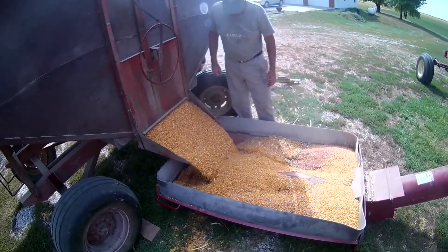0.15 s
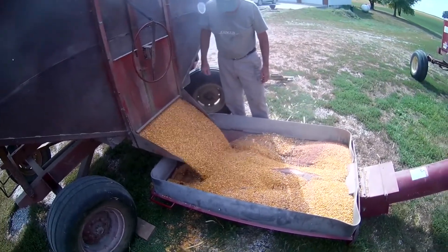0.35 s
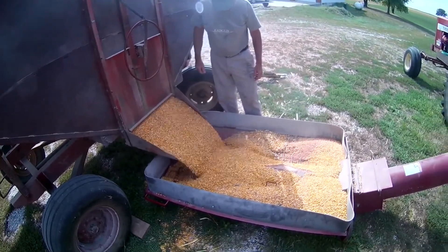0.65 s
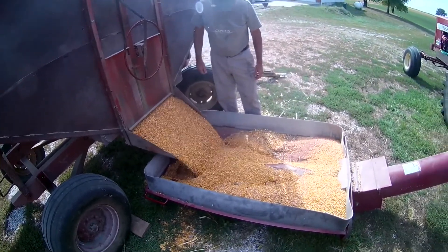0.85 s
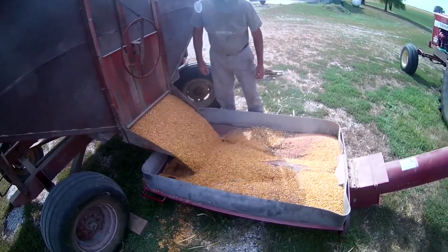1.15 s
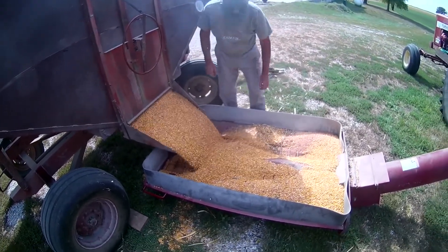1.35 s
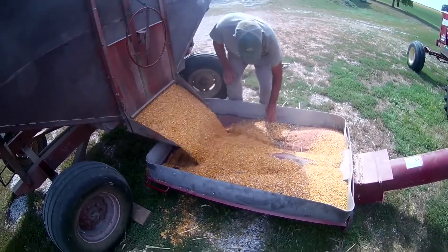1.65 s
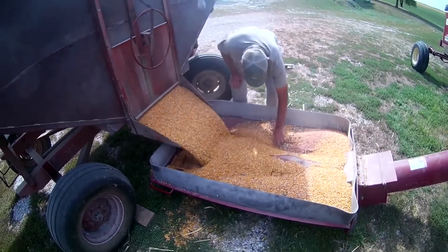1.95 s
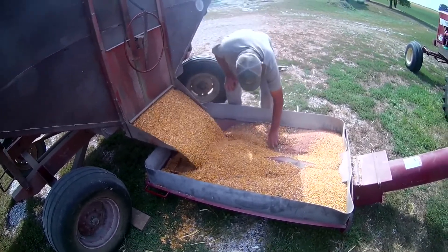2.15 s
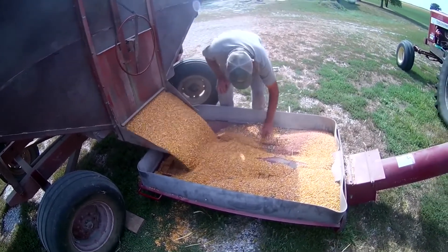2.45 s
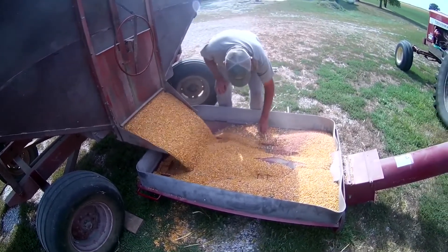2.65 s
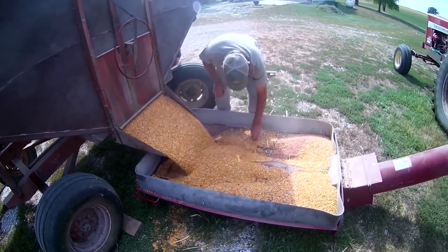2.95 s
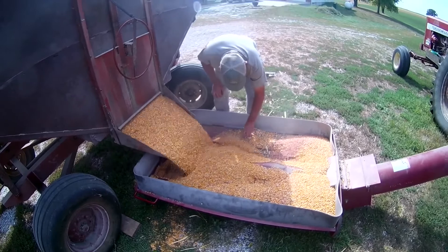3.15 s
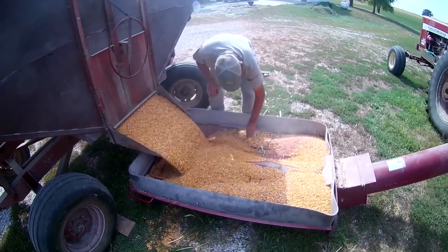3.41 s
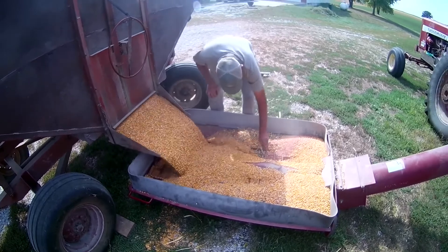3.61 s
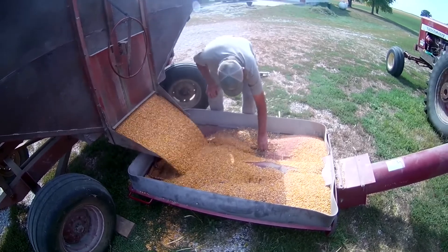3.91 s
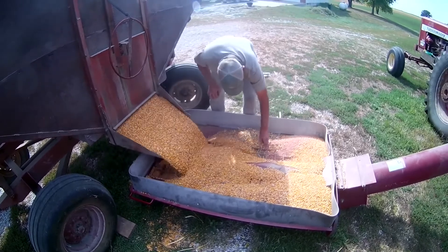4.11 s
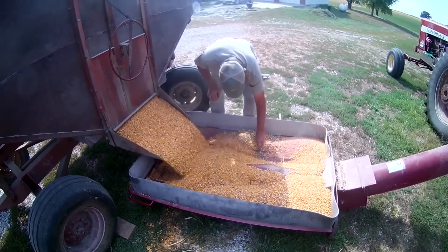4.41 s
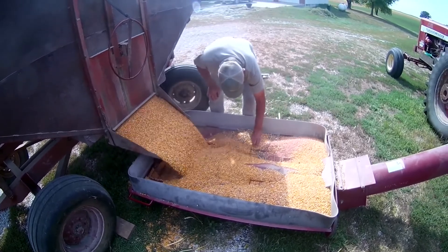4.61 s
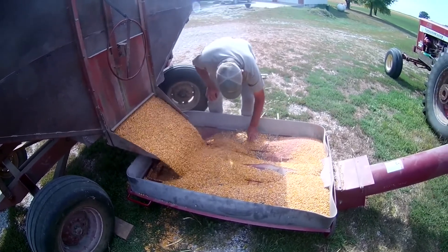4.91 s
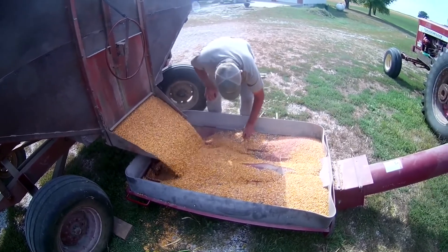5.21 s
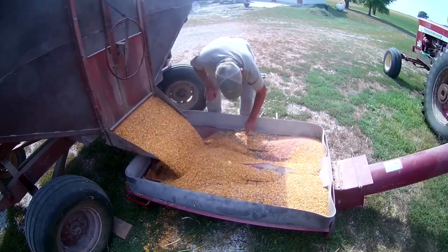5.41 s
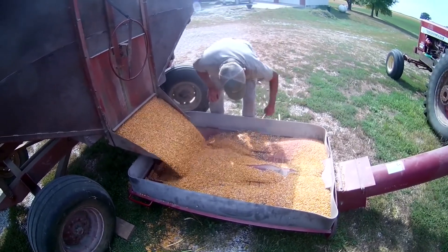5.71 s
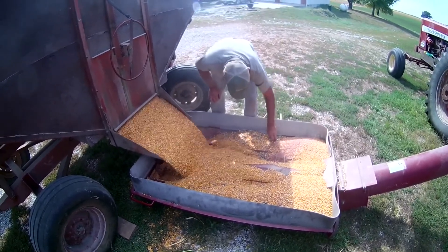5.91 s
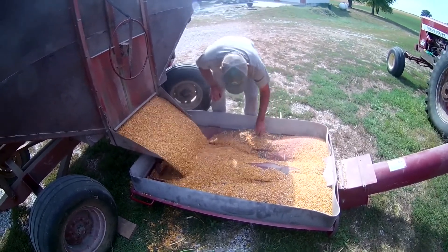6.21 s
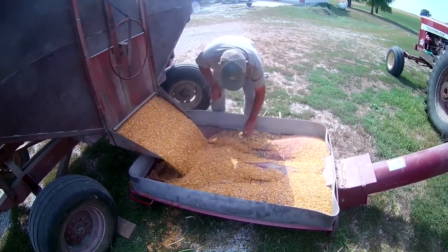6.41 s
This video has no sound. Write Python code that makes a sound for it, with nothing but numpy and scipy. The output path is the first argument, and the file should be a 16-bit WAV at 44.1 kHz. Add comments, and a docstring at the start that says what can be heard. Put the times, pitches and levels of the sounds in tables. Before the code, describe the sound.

Constant farm machinery roar: engine drone, piercing gear whine around 1150 hertz, clatter, and the dense bright hiss of corn pouring into a hopper.

```python
"""A six-cylinder diesel tractor idles fast in a farmyard and turns a grain auger: sines locked to the engine
cycle give engine orders, gear whine and hydraulic pump; shaped noise gives clatter and roar. Noise-driven
resonators ring as housing and auger tube. A second motor, steady sines, drones just below the firing rate, so
the bass throbs. Shelled corn, random impulses and noise, hisses down a steel chute into the hopper. Faint
steady tones lie at the very top. A small boxed-in microphone hears it and adds an airy top hiss, shaped noise."""
import sys
import numpy as np
from scipy import signal
from scipy.fft import rfft, irfft
from scipy.io import wavfile
from scipy.ndimage import uniform_filter1d

SR = 44100
rng = np.random.default_rng(int(sys.argv[2]) if len(sys.argv) > 2 else 0)


def output_pcm(signal):
    """Save a mono or channel-first signal as 16-bit PCM at the path in sys.argv[1].

    Samples are clipped to [-1, 1] before scaling.
    """
    pcm = np.clip(np.atleast_2d(signal).T, -1, 1) * 32767
    wavfile.write(sys.argv[1], SR, np.round(pcm).astype(np.int16))


N = 289296

# engine run: time_s, engine_cycle_hz, whine_level_db
ENGINE_RUN = [(0.0, 11.296, -49.9), (0.5, 11.303, -48.5), (1.2, 11.3, -47.9), (1.6, 11.326, -45.6),
              (2.1, 11.324, -42.0), (3.1, 11.338, -42.8), (3.8, 11.315, -41.4), (4.2, 11.29, -46.3),
              (4.8, 11.316, -42.0), (5.6, 11.326, -41.0), (5.95, 11.338, -44.6), (6.56, 11.308, -41.4)]
# strongest engine tones: multiple_of_engine_cycle, level_db
ENGINE_ORDERS = [(6, -56.0), (12, -65.0), (13, -68.0), (14, -69.0), (15, -65.0), (16, -61.0), (18, -62.0),
                 (29, -66.0), (45, -69.0), (49, -68.0), (52, -67.0), (55, -67.0), (56, -59.0), (60, -67.0),
                 (63, -68.0), (66, -62.0), (67, -67.0), (69, -61.0), (71, -62.0), (74, -68.0), (75, -64.0),
                 (81, -65.0), (90, -67.0), (93, -60.0), (95, -65.0), (96, -58.0), (97, -63.0), (99, -57.0),
                 (103, -59.0), (105, -58.0), (107, -63.0), (108, -54.0), (109, -62.0), (110, -60.0),
                 (111, -55.0), (112, -61.0), (113, -63.0), (115, -58.0), (117, -57.0), (123, -61.0),
                 (124, -66.0)]
# hydraulic pump ripple: multiple_of_pump_rate, level_db
PUMP_RIPPLE = [(1, -73), (3, -59), (6, -65), (7, -55), (8, -64), (9, -70)]
# second motor: pitch_hz, level_db
DRONE_TONES = [(65.025, -58), (130.05, -73), (184.75, -61), (260.1, -73)]
# spectrum shape of block, exhaust and auger tube: frequency_hz, relative_db
ROAR_SHAPE = [(20, -22.5), (55, -15), (85, -11.5), (240, -13), (330, -9), (490, -13), (565, -9.5),
              (670, -13.5), (1010, -10), (1250, -3), (1320, -2.5), (1430, -14.5), (1590, -12.5),
              (1690, -8.5), (1890, -13), (2020, -8.5), (2300, -19), (2700, -27.5), (3500, -58)]
# spectrum shape of kernels on sheet steel: frequency_hz, relative_db
CORN_SHAPE = [(1800, -26), (2700, -17), (2830, -3.5), (3000, -9.5), (3440, 0), (3530, -9), (3620, -4.5),
              (3720, -7.5), (3840, 1.5), (3950, -1.5), (4100, 1), (4260, -5), (4540, -1), (5350, -14.5),
              (5660, -8.5), (6050, -14), (6300, -8.5), (6480, -11), (6800, -2), (7450, -17), (8500, -38)]
# spectrum shape of the microphone's airy top hiss: frequency_hz, relative_db
TOP_HISS_SHAPE = [(6500, -26), (7600, 3), (8500, 1), (10100, -6.5), (10950, -1), (12200, -16), (15700, -17)]
# thin steady tones at the very top: pitch_hz, level_db
HIGH_TONES = [(12677.7, -104), (12756.7, -96), (12835.7, -96), (12914.7, -106)]
# microphone port cancellations: centre_hz, width_hz
PORT_NOTCHES_HZ = [(7880, 440), (7980, 450)]
# resonances of housing and auger tube: centre_hz, width_hz, level_db
HOUSING_RINGS = [(558.3, 11, -65.5), (636, 8, -68.5), (1228, 14, -62.5), (1260, 12, -60.5), (1278, 8, -61),
                 (1301, 11, -60), (1334, 8, -64)]

FIRING_ORDER, WHINE_ORDER, PUMP_ORDER = 6, 102, 16.414  # per engine cycle
KNOCK_AT_CYCLES = .548  # hardest firing knock, share of the cycle
KNOCK_FROM_ORDER, KNOCK_SCATTER_WAVES = 90, .17  # orders from here up swell loosely together on the knock
PUMP_LEAD_PULSES = .107  # pump phase at the start
DRONE_CANCELS_S = .2  # drone and firing tone are opposed here
ROAR_DB, CLATTER_DB = -45, -51
CORN_DB, TOP_HISS_DB = -53.5, -71
KERNELS_PER_S, KERNEL_SPREAD_DB = 9000, 2  # spread: mean of an exponential draw
SCREW_HZ, SCREW_SWING_DB = 6.0, .3  # the screw gulps corn once a turn
TOP_HZ = 15700


def undb(db):
    """Decibels to gain."""
    return 10 ** (np.asarray(db) / 20)


def level(x, db):
    """Scale to an rms level in dB."""
    return x * undb(db) / np.sqrt(np.mean(x ** 2))


def colour(x, points):
    """Filter through (Hz, dB) points joined on a log-frequency axis."""
    hz, db = np.transpose(points)
    bins_hz = np.maximum(np.arange(N // 2 + 1) * SR / N, 1)
    gain = undb(np.interp(np.log(bins_hz), np.log(hz), db))
    return irfft(rfft(x) * gain, N)


def walk(rate_hz):
    """Random levels held 1 / rate_hz seconds and smoothed twice; spread near 1."""
    hold = int(SR / rate_hz)
    steps = np.repeat(rng.standard_normal(N // hold + 1), hold)
    smooth = uniform_filter1d(uniform_filter1d(steps, hold), hold)
    return np.sqrt(2) * smooth[:N]


def tone(cycles, db):
    """Sine of rms level db following a running count of cycles."""
    return np.sqrt(2) * undb(db) * np.sin(2 * np.pi * cycles)


def gear_whine(cycles, whine_db):
    """Tooth meshing: one tone locked to the engine, its level flickering."""
    return tone(WHINE_ORDER * (cycles - KNOCK_AT_CYCLES), whine_db + 0.7 * walk(11))


def engine_orders(cycles, wavers):
    """Multiples of the cycle: exhaust tones hold still, higher ones waver through rattling panels."""
    out = np.zeros(N)
    for k, (order, db) in enumerate(ENGINE_ORDERS):
        depth_db = 2.3 * min(order / KNOCK_FROM_ORDER, 1) ** 2
        start = rng.random() * (order != FIRING_ORDER)  # firing starts at phase zero
        if order >= KNOCK_FROM_ORDER:
            start = KNOCK_SCATTER_WAVES * walk(.7) - order * KNOCK_AT_CYCLES
        out += tone(order * cycles + start, db + depth_db * wavers[k % len(wavers)])
    return out


def hydraulic_pump(cycles, wavers):
    """Pressure ripple: harmonics of a pump geared to the engine."""
    pulses = PUMP_ORDER * cycles + PUMP_LEAD_PULSES
    return sum(tone(multiple * pulses, db + 1.7 * wavers[k])
               for k, (multiple, db) in enumerate(PUMP_RIPPLE))


def clatter(cycles):
    """Valves, injectors and gear teeth knock in the same noise pattern every cycle."""
    size = int(SR / ENGINE_RUN[0][1])
    multiples = rfft(rng.standard_normal(size))
    # leave out multiples that sound as tones
    multiples[[WHINE_ORDER] + [int(order) for order, _ in ENGINE_ORDERS]] = 0
    pattern = irfft(multiples, size)
    knocks = np.interp(cycles % 1 * len(pattern), np.arange(len(pattern)), pattern)
    return level(colour(knocks, ROAR_SHAPE), CLATTER_DB)


def roar():
    """Loose noise of block, exhaust and auger tube, its level flickering."""
    noise = rng.standard_normal(N) * undb(0.65 * walk(9))
    return level(colour(noise, ROAR_SHAPE), ROAR_DB)


def tractor(cycles, whine_db):
    """Engine-locked tones, repeating clatter and loose roar; orders and pump share level wavers."""
    wavers = [walk(2.577) for _ in range(6)]
    locked = gear_whine(cycles, whine_db) + engine_orders(cycles, wavers) + hydraulic_pump(cycles, wavers)
    return locked + clatter(cycles) + roar()


def housing():
    """Narrow resonances, each shaken by its own noise, swell and fade by chance."""
    out = np.zeros(N)
    for hz, width_hz, db in HOUSING_RINGS:
        b, a = signal.iirpeak(hz, hz / width_hz, fs=SR)
        out += level(signal.lfilter(b, a, rng.standard_normal(N)), db)
    return out


def drone(t, cycles):
    """Second motor of steady pitch; its lowest tone beats against the firing rate."""
    opposed = FIRING_ORDER * np.interp(DRONE_CANCELS_S, t, cycles) + .5
    return sum(tone(hz * (t - DRONE_CANCELS_S) + opposed, db + .4 * walk(3.4)) for hz, db in DRONE_TONES)


def corn(gulp_db):
    """Dense kernel impacts of uneven force over noise; the stream thickens and thins."""
    chance, force = rng.random((N, 2)).T
    hits = (chance < KERNELS_PER_S / SR) * rng.standard_normal(N)
    hits = hits * undb(-KERNEL_SPREAD_DB * np.log(1 - force))
    stream = level(hits, -4) + rng.standard_normal(N)
    stream = stream * undb(.2 * walk(18) + gulp_db)
    return level(colour(stream, CORN_SHAPE), CORN_DB)


def top_hiss(swing_db):
    """Airy top hiss of the microphone: shaped noise that flickers and follows a slight level swing."""
    noise = rng.standard_normal(N) * undb(.4 * walk(25) + swing_db)
    return level(colour(noise, TOP_HISS_SHAPE), TOP_HISS_DB)


def high_tones(t):
    """Faint sines of fixed pitch and level, random phase."""
    return sum(tone(hz * t + rng.random(), db) for hz, db in HIGH_TONES)


def scene():
    """Sum of tractor, housing, second motor, corn, top hiss and high tones, one channel."""
    t = np.arange(N) / SR
    time_s, cycle_hz, whine_db = np.transpose(ENGINE_RUN)
    cycles = np.cumsum(np.interp(t, time_s, cycle_hz)) / SR
    engine = tractor(cycles, np.interp(t, time_s, whine_db))
    gulp_db = SCREW_SWING_DB * np.sin(2 * np.pi * SCREW_HZ * t)
    hisses = corn(gulp_db) + top_hiss(gulp_db)
    return (engine + housing() + drone(t, cycles) + hisses + high_tones(t))[None]


def record(dry):
    """The microphone port cancels a narrow band in two notches; a steep low-pass cuts the top."""
    heard = dry
    for hz, width_hz in PORT_NOTCHES_HZ:
        b, a = signal.iirnotch(hz, hz / width_hz, fs=SR)
        heard = signal.lfilter(b, a, heard)
    low_pass = signal.ellip(14, .2, 70, TOP_HZ, fs=SR, output="sos")
    return signal.sosfilt(low_pass, heard)


dry = scene()
out = record(dry)
output_pcm(out)
```